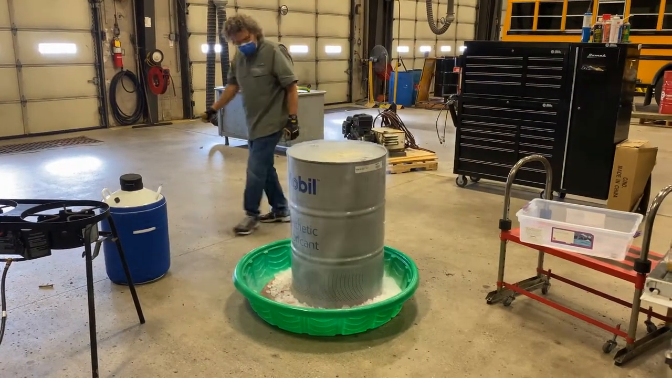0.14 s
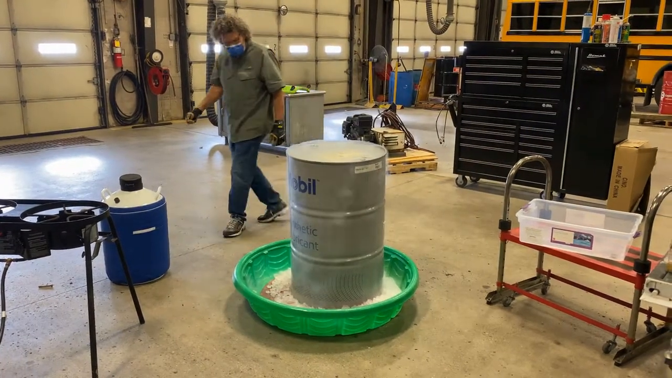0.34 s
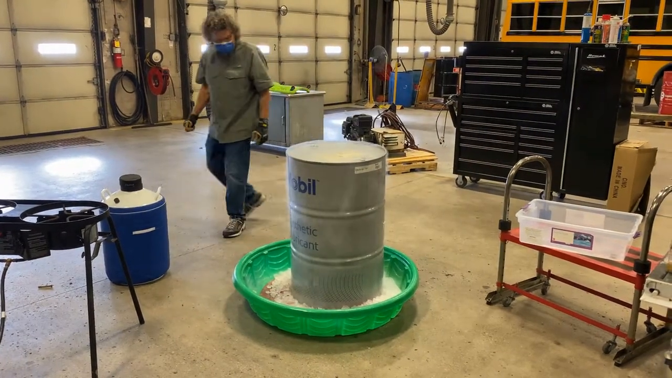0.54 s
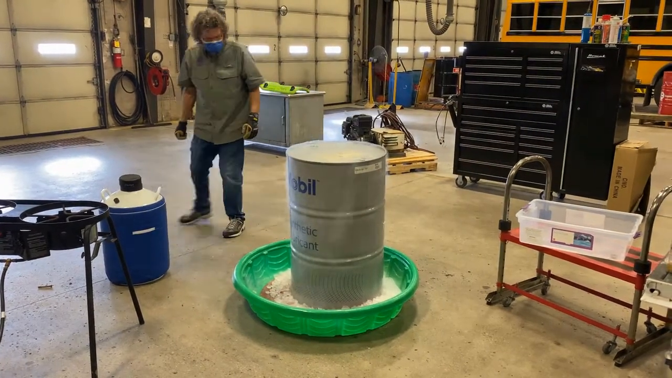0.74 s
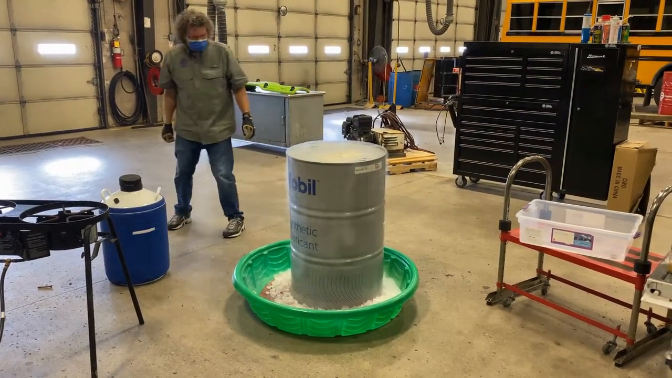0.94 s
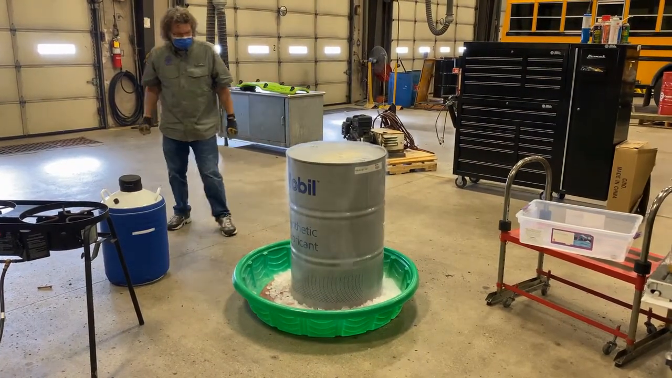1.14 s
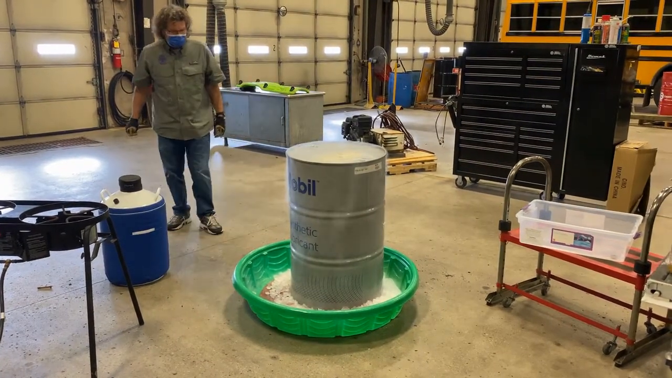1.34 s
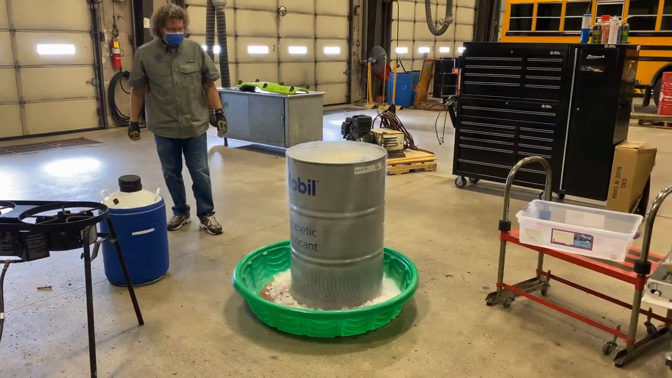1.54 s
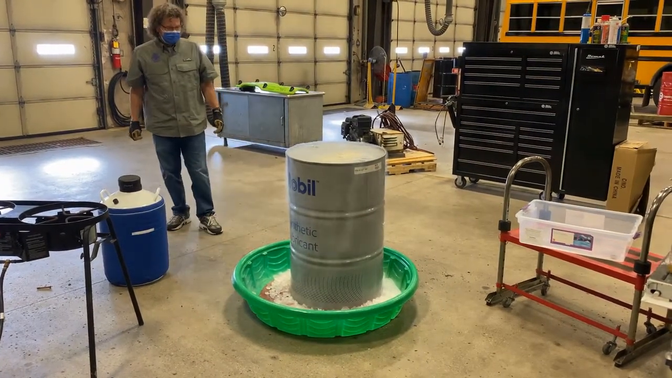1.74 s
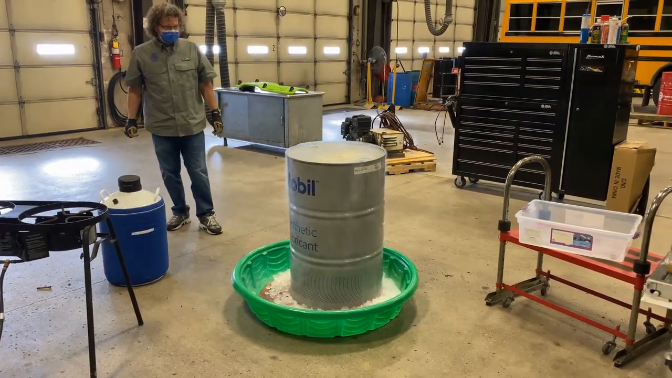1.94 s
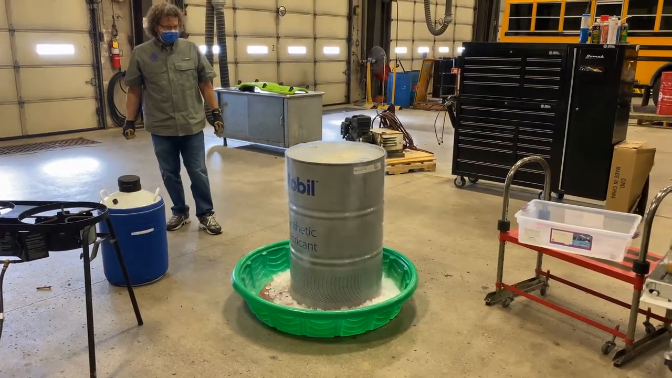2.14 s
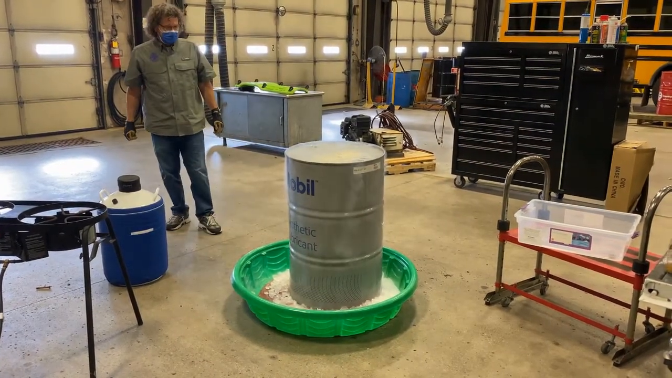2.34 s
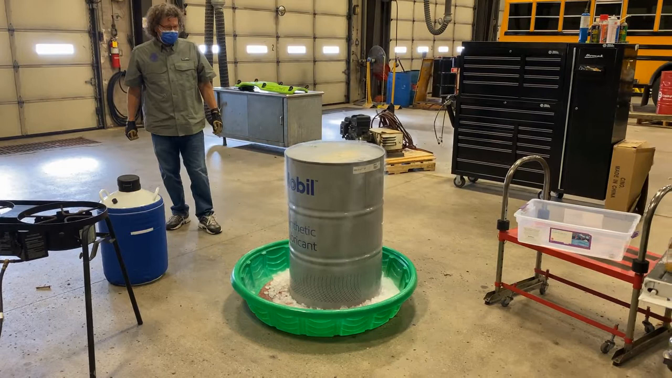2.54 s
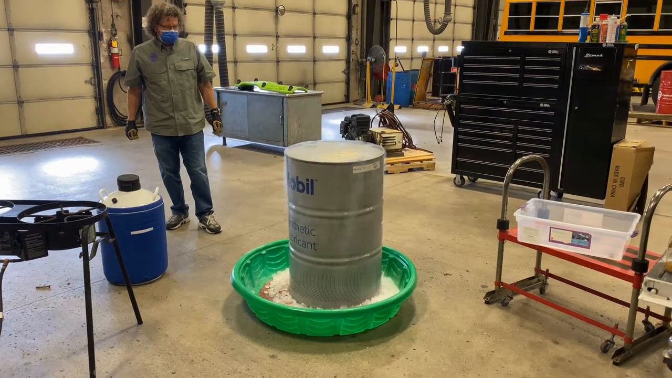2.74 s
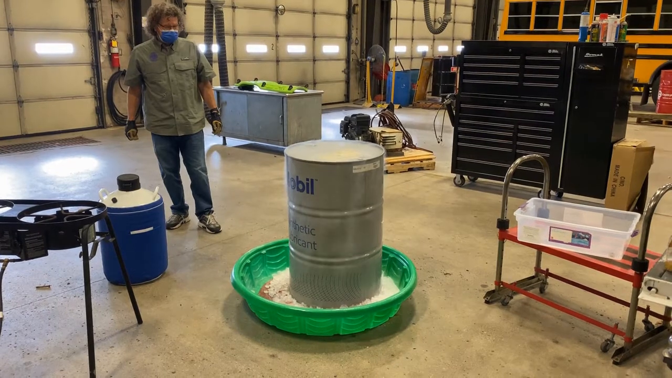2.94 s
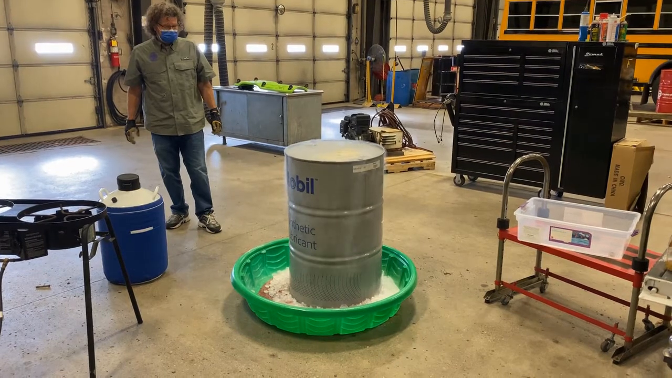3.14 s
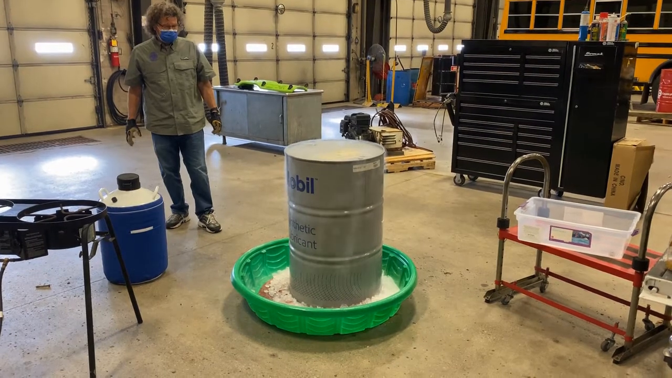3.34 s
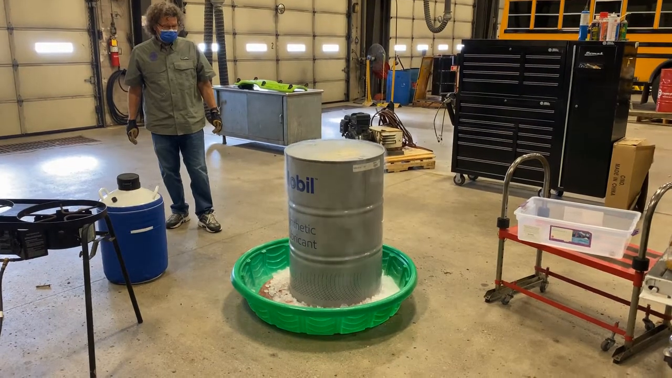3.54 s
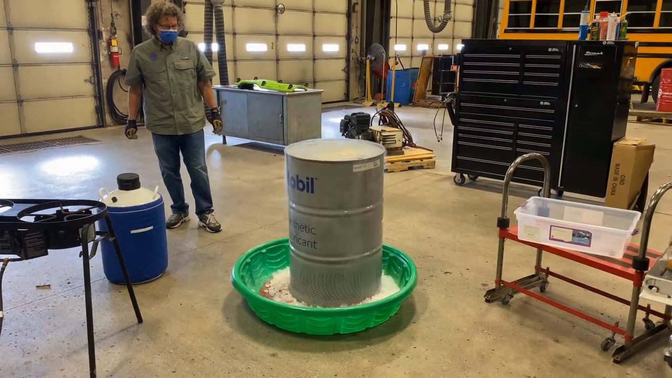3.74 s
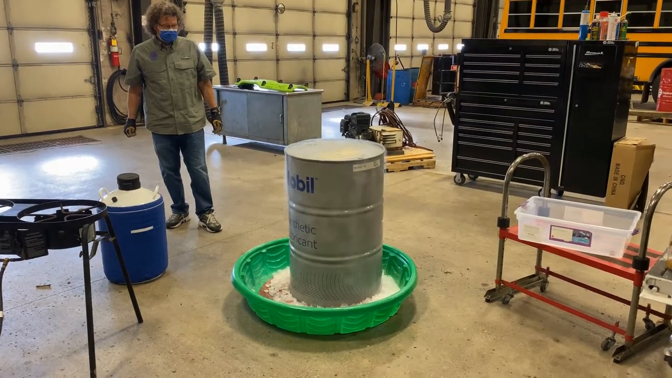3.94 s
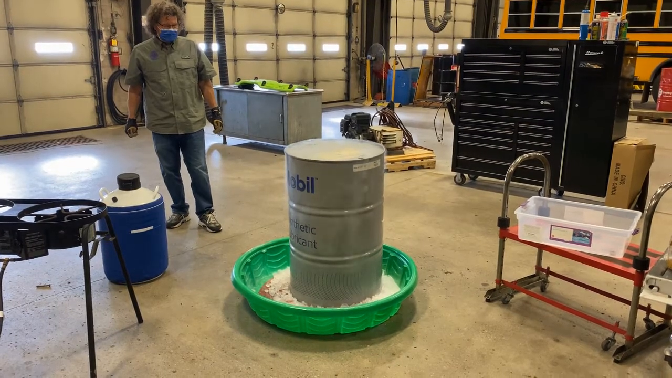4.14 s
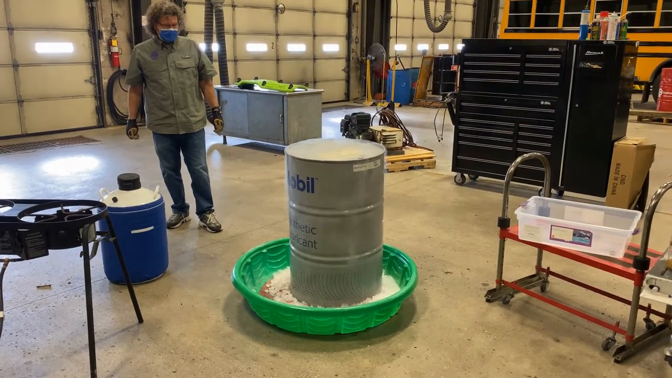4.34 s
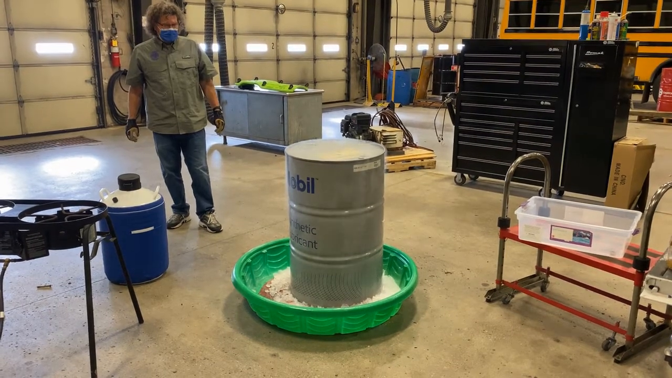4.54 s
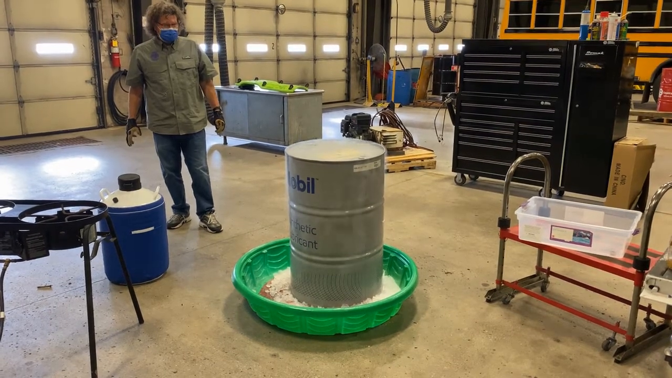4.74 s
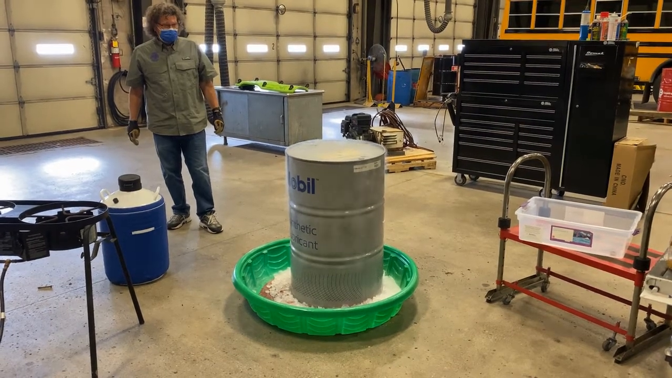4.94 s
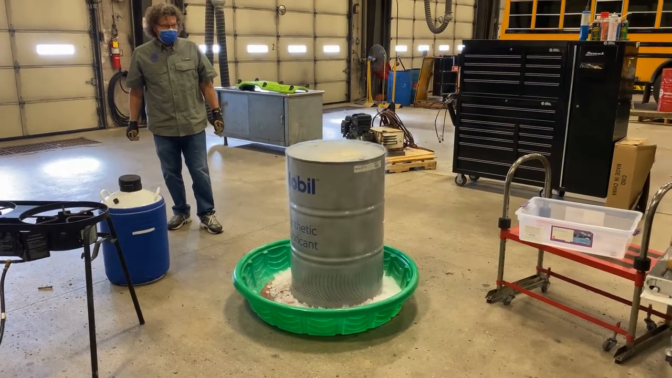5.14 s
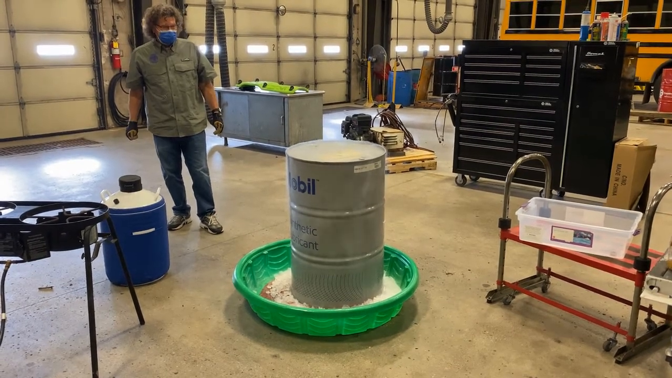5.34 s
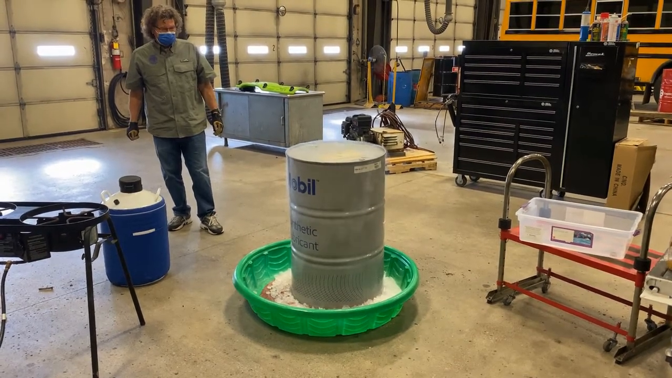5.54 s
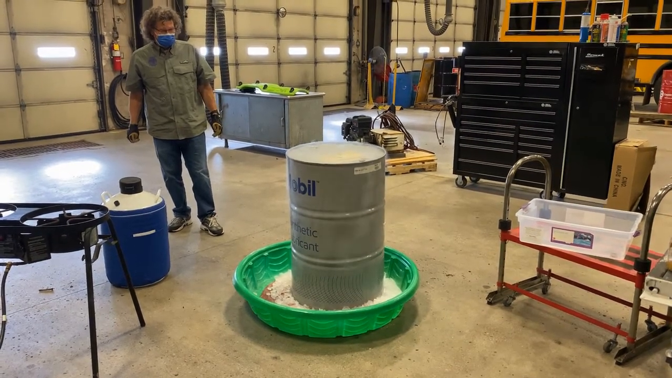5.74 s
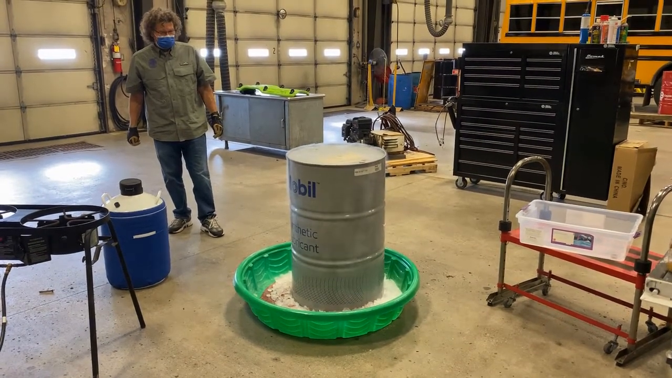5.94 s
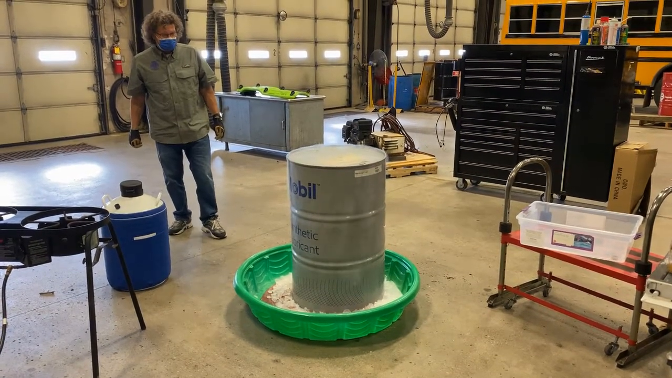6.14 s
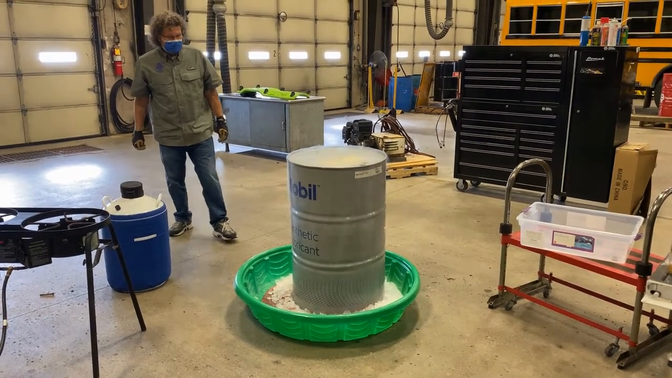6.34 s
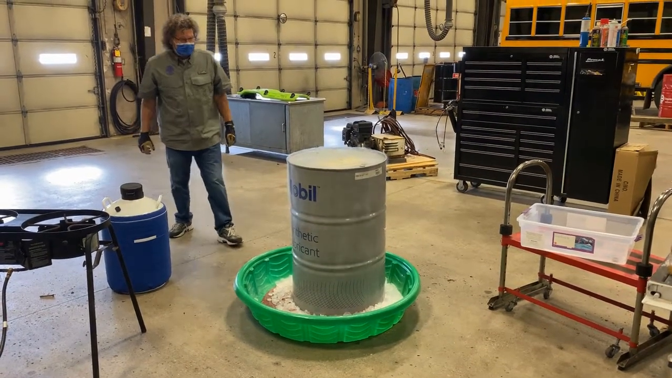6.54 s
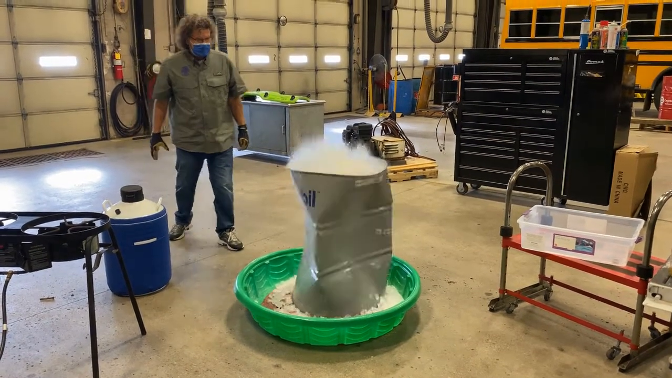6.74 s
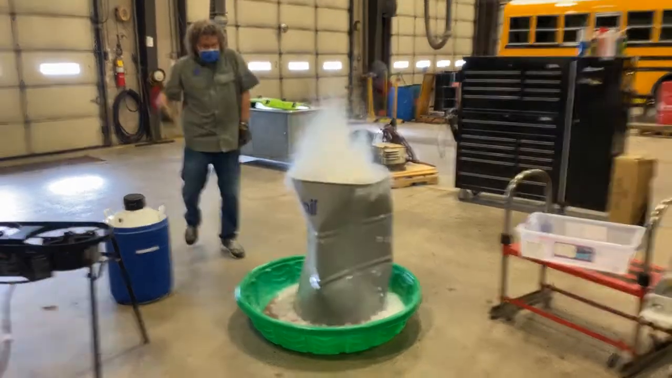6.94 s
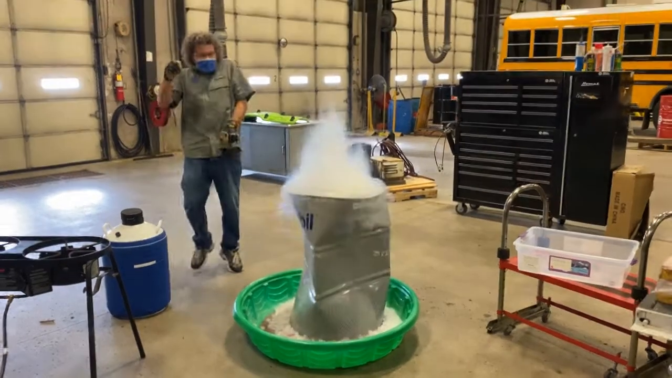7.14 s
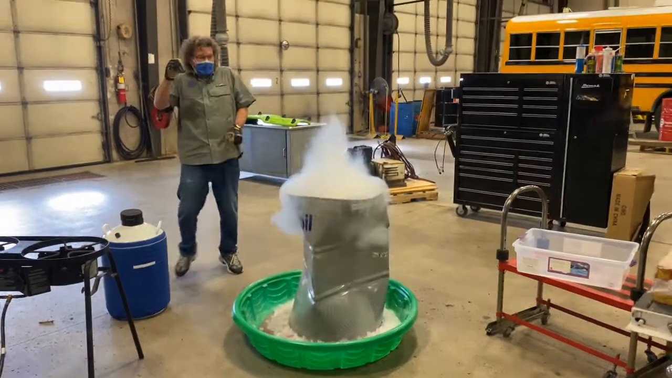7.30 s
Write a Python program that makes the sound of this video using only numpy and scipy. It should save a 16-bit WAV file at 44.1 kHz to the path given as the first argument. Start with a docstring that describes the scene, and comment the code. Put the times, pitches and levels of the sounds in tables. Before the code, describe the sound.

A low steady workshop hum with faint ice fizz and sparse metallic ticks, then a sealed steel drum suddenly implodes with a huge crunching bang.

```python
"""A sealed steel drum, chilled with ice, implodes in a large workshop where a distant compressor hums.
First ice fizzes as filtered noise and crackle, and the loaded shell ticks as small cracks ringing its modes.
Then the wall creaks, buckles in a burst of snaps and slams inward as heaving modes and a puff of pressure.
The hall booms in shaped, decaying noise; the recorder's gain control ducks and lets the tail swell back."""
import sys
import numpy as np
from scipy import signal
from scipy.fft import rfft, irfft, next_fast_len
from scipy.io import wavfile
from scipy.ndimage import uniform_filter1d, minimum_filter1d

SR = 44100
rng = np.random.default_rng(int(sys.argv[2]) if len(sys.argv) > 2 else 0)


def waveform_to_disk(signal):
    """Save audio, clipped to [-1, 1], as 16-bit WAV at the path in sys.argv[1]."""
    frames = np.transpose(np.atleast_2d(signal))
    scaled = np.clip(frames, -1, 1) * 32767
    samples = np.round(scaled).astype(np.int16)
    wavfile.write(sys.argv[1], SR, samples)


N = 325017
TIME = np.arange(N) / SR

# Spectra are (f/Hz, relative level/dB per Hz); modes are (f/Hz, relative level/dB, t60/s).
# compressor: multiples of the stroke rate with their own levels, some strong, some weak
# (multiple, rms level before waver and pan/dB)
STROKES_HZ = 10.195
HUM_MULTIPLES = [(6, -52), (8, -68), (9, -57), (10, -58), (11, -48.5), (12, -53.5), (14, -49), (15, -46.5),
                 (16, -45), (17, -58), (20, -49), (22, -54), (36, -64), (46, -70)]
# skirt for its other multiples (f/Hz, rms level before waver and pan/dB)
HUM_SKIRT_LEVELS = [(40, -58), (60, -50), (190, -59), (210, -65), (240, -55), (270, -74.5), (350, -73),
                    (450, -78.5), (600, -104), (1000, -88)]
# thin motor tones (f/Hz, rms level before pan/dB)
WHINE_TONES = [(936, -70), (1240, -72.5), (1130, -72.5), (2620, -69.5)]
# ventilation spectrum (f/Hz, relative level/dB per Hz)
RUMBLE_SPECTRUM = [(20, -32), (35, -12), (58, -3.5), (90, -4.5), (160, -8.5), (250, -12.5), (400, -21),
                   (750, -30), (2000, -34.5), (16000, -86)]
# ice fizz spectrum (f/Hz, relative level/dB per Hz)
FIZZ_SPECTRUM = [(200, -0.5), (700, -5), (1200, 0.5), (1900, -2), (2300, 1.5), (2650, 2), (3200, 0.5),
                 (4000, -3), (5500, -6.5), (7000, -6.5), (9500, -6.5), (12000, -11), (14000, -9),
                 (16000, -13.5)]
# left-right likeness of diffuse sound (f/Hz, correlation from -1 to 1)
PORT_LIKENESS = [(60, 1), (140, 0.84), (300, 0.41), (700, -0.14), (2500, 0.32), (5000, -0.25), (7000, 0.2)]
# ticks of the cold shell, with two bright echoes of the strongest at 0.6295 and 0.6528 s
# (t/s, relative level/dB, centre f/Hz, relative treble level/dB, ring spread/octaves)
SHELL_TICKS = [(0.077, -32.5, 1590, -13.5, 1), (0.2368, -37.5, 1690, -20, 1), (0.385, -37.5, 2800, -26, .7),
               (0.516, -33.5, 2270, -35, 0.72), (0.6175, -11, 1800, -22, 0.46), (0.6185, -33, 540, -30, .3),
               (0.6295, -25, 3700, -11, 0.45), (0.6528, -28.5, 2100, -12, 1), (0.7574, -33, 1500, -32, 0.3),
               (1.0555, -44.5, 2400, -9, 0.89), (1.0839, -39, 2360, -10, 0.9),
               (1.5065, -31.5, 2500, -17, .9), (1.7589, -41, 2570, -24, 1), (2.149, -23, 2130, -25, .8),
               (2.1495, -31, 5500, -26, 0.25), (2.2457, -41, 1780, -8, 0.86), (2.3431, -39, 5400, -18, .3),
               (2.7982, -34, 1400, -15.5, 0.67), (2.9482, -40.5, 1730, -11, 0.7),
               (3.03, -42.5, 1270, -30, .2), (3.0963, -23.5, 2270, -23, .35), (3.0975, -34, 540, -27, .3),
               (3.099, -25, 1620, -28, .35), (3.2255, -33, 2590, -12.5, 1.1),
               (3.3203, -32.5, 2300, -21, 0.73), (3.4909, -32.5, 1820, -12.5, 0.33),
               (3.7309, -41.5, 2620, -29.5, 0.77), (4.0815, -25, 2450, -18.5, 0.52),
               (4.313, -33, 2100, -23, 0.38), (4.784, -41, 2900, -15, .5), (4.8352, -40.5, 3000, -16, 0.57),
               (5.0688, -34.5, 1850, -16, 0.5), (5.2105, -45, 6800, 0.5, .4), (5.475, -42, 4500, -5, .8),
               (5.5787, -44, 3000, -6.5, 1), (5.6511, -40, 1870, -20, 0.28), (6.0028, -48, 4300, -3, 1.1),
               (6.0422, -47, 4300, -5, 1), (6.0875, -34.5, 2740, -17, 0.45), (6.1404, -37, 2800, -10.5, 1),
               (6.2302, -36.5, 1580, -16.5, 0.37), (6.2941, -49.5, 5400, -0.5, 1.1),
               (6.5555, -29, 2000, -14.5, 0.79), (6.691, -32, 1900, -17, .6), (6.708, -32, 1900, -22, .6)]
# modes of the taut shell (f/Hz, relative level/dB, t60/s)
TAUT_SHELL_MODES = [(540, 3, 0.024), (1100, -7, 0.016), (1340, 0, 0.017), (1574, 3, 0.0099),
                    (1820, -2, 0.022), (2100, -1, 0.015), (2600, 0, 0.028), (2905, 1.5, 0.013),
                    (3350, -3, .012), (3750, -6, 0.013), (4420, -10, 0.0074), (5240, -10.5, 0.016),
                    (6100, -11, .012), (7300, -7, .014)]
# echoes off the floor and nearby surfaces (delay t/s, level/dB)
SURFACE_ECHOES = [(.0045, -13.5), (.011, -12)]
# hall decay (f/Hz, t60/s)
HALL_DECAY = [(60, 4.5), (120, 0), (250, 0.6), (1000, 1.16), (3000, 1.22), (6000, 1.0), (10000, 0.7),
              (16000, 0.3)]
# settling ice spectrum (f/Hz, relative level/dB per Hz)
SETTLING_SPECTRUM = [(100, -11), (400, -4), (800, -2), (1800, 3.5), (4000, -5.5), (6500, -9), (9000, -20),
                     (16000, -28)]
# creak spectrum (f/Hz, relative level/dB per Hz)
CREAK_SPECTRUM = [(300, -4), (750, -13), (1500, 0), (2800, -1), (3800, -8), (7000, -11), (9500, -10),
                  (16000, -17)]
# folding steel spectrum (f/Hz, relative level/dB per Hz)
STEEL_SPECTRUM = [(40, -27), (150, 14), (320, 4), (540, 3), (850, 1), (1300, 0), (1750, 2.5), (2150, -0.5),
                  (2680, -0.5), (3600, -4), (4400, -8.5), (5400, -12), (6600, -18), (8000, -26),
                  (11000, -40), (16000, -52)]
# largest folds snapping through (t/s, relative peak level/dB, centre f/Hz)
LARGE_FOLDS = [(6.7215, -15, 2200), (6.7245, -13, 2800), (6.7285, -15, 544), (6.7288, -11, 2600),
               (6.7305, -13, 4400), (6.7315, -6, 1700), (6.733, -14.5, 544), (6.7345, -7.5, 2900),
               (6.7345, -12, 7100), (6.7366, -11.5, 320), (6.7378, -10, 4300), (6.7398, -1, 1400),
               (6.7415, -4, 2680), (6.742, -12, 595), (6.7555, 4.5, 2900), (6.756, -5, 5000),
               (6.7585, 5, 1500), (6.7615, 3, 2600), (6.7665, 2.5, 2300), (6.7695, 4, 1290),
               (6.7735, 0, 2650), (6.779, -1, 1800), (6.792, -2.5, 3070), (6.797, -1, 2000),
               (6.802, -2, 1400), (6.811, -4, 1800)]
# modes of the buckling wall (f/Hz, relative level/dB, t60/s)
BUCKLING_WALL_MODES = [(315, -4, 0.036), (542, -4, 0.074), (680, -11, .04), (1250, -1.5, 0.054),
                       (1390, -3, .05), (1520, 0, 0.055), (1750, 1.5, 0.042), (2123, -3, .04),
                       (2345, -4, 0.057), (2644, -0.5, 0.045), (2890, -3, 0.043), (3180, -5, .04),
                       (3810, -6, .03), (4230, -4, .025), (4380, -6, .025), (4970, -7, 0.03),
                       (5990, -10, 0.025), (7070, -4, .022), (7540, -7, .022)]
# modes of the buckled shell (f/Hz, relative level/dB, t60/s)
BUCKLED_SHELL_MODES = [(232, 3, 0.72), (275, 3, .8), (312, 9, 0.5), (401, -2, 0.8), (468, 1, 0.83),
                       (546, 0, 0.5), (1082, 3, 0.8), (1220, 5, 0.7), (1272, 1, 0.7), (1525, 2, 0.5),
                       (1826, 2, 0.7), (2018, 3, 0.87), (2349, 0, 0.5), (2660, -2, 0.45), (2914, 0, 0.5),
                       (3170, 0, .5), (3898, -2, .45), (4660, -2, .45)]
# shattering ice spectrum (f/Hz, relative level/dB per Hz)
ICE_SPECTRUM = [(500, -20), (3000, -9), (7000, 3.5), (9000, 2), (12000, 0), (16000, -1.5)]
# heaving drum heads (f/Hz, relative level/dB, t60/s)
DRUM_HEAD_MODES = [(81.5, 17, 0.065), (98, 6, 0.62), (159, 14, 0.047), (175.6, -10, 0.5)]
# boom of the hall's crowded low modes (f/Hz, relative level/dB per Hz)
BOOM_SPECTRUM = [(20, -51), (42, -29), (58, -5), (80, -0.5), (100, -5), (125, -12.5), (170, -16),
                 (220, -27), (320, -21), (450, -34), (1500, -70.5)]
# phase by which left leads in the recorder's top range (f/Hz, phase/rad)
TREBLE_LEAD = [(8000, 2.8), (9300, 1.7), (10700, 0), (11500, -0.2), (12600, -2.5), (13300, -3.1),
               (14500, -4.4), (15500, -6.2)]

CREAK_S, BUCKLE_S, SLAM_S = 6.682, 6.7205, 6.7455   # the wall creaks, gives way, slams in
PORT_LAG_S = .000023   # right port after left
ONE_PORT_ABOVE_HZ, CUTOFF_HZ = 8000, 15900   # recorder


def from_db(db):
    """Decibels to gain."""
    return 10 ** (np.asarray(db) / 20)


def rms_one(x):
    """Scale to rms 1."""
    return x / np.sqrt(np.mean(x ** 2) + 1e-20)


def peak_one(x):
    """Scale to peak 1."""
    return x / np.abs(x).max()


def at_hz(points, hz):
    """Read a table on a log-frequency axis."""
    known_hz, values = np.transpose(points)
    return np.interp(np.log(np.maximum(hz, 1)), np.log(known_hz), values)


def panned(x, pan_db):
    """Set left pan_db above right; a negative value leans right."""
    return x * from_db(np.array([[.5], [-.5]]) * pan_db)


def coloured(x, spectrum):
    """Filter a steady sound through a spectrum; rms 1."""
    size = next_fast_len(N)
    hz = np.arange(size // 2 + 1) * SR / size
    filtered = irfft(rfft(x, size) * from_db(at_hz(spectrum, hz)), size)
    return rms_one(filtered[..., :N])


def diffuse(size):
    """White noise from all around: alike at both ports in the bass, loosely related higher up."""
    padded = next_fast_len(size)
    mid, side = rfft(rng.standard_normal((2, padded)))
    hz = np.arange(len(mid)) * SR / padded
    alike = np.clip(at_hz(PORT_LIKENESS, hz), -1, 1)
    both = np.sqrt(1 + alike) * mid + np.sqrt(1 - alike) * side * [[1], [-1]]
    return rms_one(irfft(both, padded)[:, :size])


def direct(x):
    """Sound straight from the drum reaches the right port a little after the left."""
    return np.array([x, np.roll(x, round(PORT_LAG_S * SR))])


def snaps(per_s, spread_db):
    """Random clicks of uneven size; rms 1."""
    sizes = from_db(spread_db * np.minimum(rng.exponential(1, N), 4))
    signed = sizes * rng.choice([-1, 1], N)
    return rms_one(signed * (rng.random(N) < per_s / SR))


def dying(t, t60):
    """Free decay, 60 dB in t60."""
    return np.exp(-np.log(1000) * t / t60)


def envelope(start_s, attack_s, hold_s, t60):
    """Straight rise to 1, hold, free decay."""
    t = TIME - start_s
    rise = np.clip(t / max(attack_s, 1e-4), 0, 1)
    return rise * dying(np.maximum(t - attack_s - hold_s, 0), t60)


def ring(t, hz, t60):
    """A struck mode: a sine in free decay from height 1."""
    return np.sin(2 * np.pi * hz * t) * dying(t, t60)


def struck(t, modes, centre_hz, spread_octaves, vary_db):
    """A local blow rings the modes near its own pitch, a little differently toward each port; peak 1."""
    hz, mode_db, t60 = np.transpose(modes)[:, :, None]
    near = np.exp(-.5 * (np.log2(hz / centre_hz) / spread_octaves) ** 2)
    weight = near * from_db(mode_db + vary_db * rng.standard_normal((2, len(hz), 1)))
    body = (weight * rng.choice([-1, 1], hz.shape) * ring(t, hz, t60)).sum(axis=1)
    return body / (np.abs(body).max() + 1e-20)


def through(x, response):
    """Pass a sound through a stereo impulse response."""
    return signal.fftconvolve(np.atleast_2d(x), response, axes=-1)[:, :N]


def compressor(pan_db=-4.0, waver_db=1.5, port_phase=0.48, scatter=0.54):
    """Every stroke repeats the same push; the hall smears it evenly over the cycle, into a drone."""
    levels, out = dict(HUM_MULTIPLES), np.zeros((2, N))
    stroke = 2 * np.pi * STROKES_HZ * TIME + rng.uniform(0, 2 * np.pi)
    golden_angle = np.pi * (3 - np.sqrt(5))
    knots = np.linspace(0, TIME[-1], 20)
    for k in range(4, 56):
        level_db = levels.get(k, at_hz(HUM_SKIRT_LEVELS, k * STROKES_HZ))
        # quadratic phase spreads the multiples over the cycle
        smear = golden_angle * k * k / 2 + scatter * rng.standard_normal()
        phase = smear + port_phase * rng.standard_normal((2, 1)) * k / 20
        waver = np.interp(TIME, knots, from_db(level_db + waver_db * rng.standard_normal(20)))
        out += np.sqrt(2) * waver * np.sin((k * stroke + phase).astype(np.float32))
    return panned(out, pan_db)


def whines(pan_db=-9.0, fading=0.55, count=40):
    """Thin motor tones reach each port by many paths, so they fade in and out."""
    knots, out = np.linspace(0, TIME[-1], count), np.zeros((2, N))
    for hz, tone_db in WHINE_TONES:
        steady = np.exp(2j * np.pi * rng.random((2, 1)))
        wandering = rng.standard_normal((2, count)) + 1j * rng.standard_normal((2, count))
        paths = steady + fading * wandering
        carrier = np.exp(2j * np.pi * hz * TIME)
        tone = np.array([(np.interp(TIME, knots, port) * carrier).real for port in paths])
        out += from_db(tone_db) * rms_one(tone)
    return panned(out, pan_db)


def ventilation(level_db=-45):
    """Ventilation rumbles as low, diffuse noise."""
    return panned(from_db(level_db) * coloured(diffuse(N), RUMBLE_SPECTRUM), pan_db=-2.0)


def fizz(start_db=-49, fade_db_per_s=0.7457, crackle_db=-11, drop_after_slam_db=-7):
    """Ice fizzes with fine crackle, fading as the drum cools; the fizz is quieter after the slam."""
    level_db = start_db - fade_db_per_s * TIME + drop_after_slam_db * (TIME > SLAM_S)
    crackle = from_db(crackle_db) * snaps(per_s=500, spread_db=3.0)
    return from_db(level_db) * coloured(diffuse(N) + crackle, FIZZ_SPECTRUM)


def ticks(level_db=-0.5, treble_db=11.5, crack_t60=0.029, vary_db=3.5, attack_s=0.00056):
    """Each tick is a tiny crack with a ring of the shell, strongest near the tick's own pitch."""
    t, out = TIME[:SR // 10], np.zeros((2, N))
    bright = signal.butter(1, [4500, 11500], "band", fs=SR, output="sos")
    onset = 1 - np.exp(-t / attack_s)
    for s, peak_db, centre_hz, share_db, spread_octaves in SHELL_TICKS:
        body = onset * struck(t, TAUT_SHELL_MODES, centre_hz, spread_octaves, vary_db)
        burst = direct(rng.standard_normal(len(t))) * dying(t, crack_t60)
        crack = onset * signal.sosfilt(bright, burst)
        tick = panned(peak_one(body), pan_db=-5.5) + from_db(share_db + treble_db) * peak_one(crack)
        start = round(s * SR)
        out[:, start:start + len(t)] += from_db(peak_db + level_db) * tick
    echoes = sum(from_db(echo_db) * np.roll(out, round(delay * SR)) for delay, echo_db in SURFACE_ECHOES)
    return out + echoes


def hall(x, size=512):
    """The hall stores energy in each band and gives it back as diffuse noise with that band's decay."""
    hz, _, frames = signal.stft(x, SR, nperseg=size)
    fed = uniform_filter1d(np.mean(np.abs(frames) ** 2, axis=0), size=3, axis=0)
    kept = dying(size / 2 / SR, at_hz(HALL_DECAY, hz)) ** 2   # energy left after one frame
    stored = np.zeros_like(fed)
    for i in range(2, fed.shape[1]):   # the first reflections take two frames to return
        stored[:, i] = kept * stored[:, i - 1] + (1 - kept) * fed[:, i - 2]
    air = signal.stft(diffuse(N), SR, nperseg=size)[2]
    air = air / np.sqrt(np.mean(np.abs(air) ** 2))
    return signal.istft(air * np.sqrt(np.abs(stored)), SR, nperseg=size)[1][:, :N]


def settling_ice(start_s=.626, level_db=-39, t60=0.85, slide_db=-52):
    """The strongest tick shakes the ice on the lid, which crackles as it settles and then slides a little."""
    crackle = coloured(diffuse(N) + snaps(per_s=390, spread_db=0.5), SETTLING_SPECTRUM)
    shaken = from_db(level_db) * (TIME > start_s) * dying(np.abs(TIME - start_s), t60)
    sliding = from_db(slide_db) * envelope(start_s=1.03, attack_s=0.046, hold_s=0.21, t60=0.69)
    return crackle * (shaken + sliding)


def creak(level_db=-42.5, attack_s=0.014, hold_s=0.024, t60=0.08, scatter_db=-4):
    """The wall starts to give with a faint, gritty creak."""
    grit = direct(snaps(per_s=1500, spread_db=2.0)) + from_db(scatter_db) * diffuse(N)
    return from_db(level_db) * envelope(CREAK_S, attack_s, hold_s, t60) * coloured(grit, CREAK_SPECTRUM)


def crush():
    """Swell and decay of the grinding as the walls meet."""
    return envelope(SLAM_S, attack_s=0.00078, hold_s=0.011, t60=0.15)


def big_folds(level_db=-2.0, spread_octaves=0.42, vary_db=4.0, attack_s=0.00107, detune=0.013,
              sag_per_s=0.32, path_s=0.00014):
    """Each large fold snaps through and rings the wall; the pitch sags as the panel loses its tension."""
    t, out = TIME[:SR // 8], np.zeros((2, N))
    for s, peak_db, centre_hz in LARGE_FOLDS:
        arrived = np.maximum(t - path_s * rng.random((2, 1, 1)), 0)
        bent = arrived * (1 + detune * rng.standard_normal() - sag_per_s * arrived / 2)
        onset = 1 - np.exp(-t / attack_s)
        fold = onset * struck(bent, BUCKLING_WALL_MODES, centre_hz, spread_octaves, vary_db)
        start = round(s * SR)
        out[:, start:start + len(t)] += from_db(peak_db + level_db) * peak_one(fold)
    return out


def folding_steel(folding_db=-5.5, crush_db=-5, scatter_db=-2.0, ring_db=-5.0):
    """Folds race through the wall as a swelling burst of snaps, the walls grind and the shell rings on."""
    folding = from_db(folding_db) * envelope(BUCKLE_S, attack_s=0.058, hold_s=0, t60=0.35)
    level = folding + from_db(crush_db) * crush()
    # the wide wall radiates along many paths
    creases = snaps(per_s=2000, spread_db=1.5) + from_db(scatter_db) * diffuse(N)
    steel = level * coloured(creases, STEEL_SPECTRUM) + big_folds()
    shell = sum(from_db(mode_db) * rng.choice([-1, 1], (2, 1)) * ring(TIME[:SR], hz, t60)
                for hz, mode_db, t60 in BUCKLED_SHELL_MODES)
    rings = through(steel, shell / np.sqrt(5 * np.sum(shell ** 2)))
    pan_db = np.where(TIME < SLAM_S, -7.5, -1.0)   # well to the right, then nearly centred
    return panned(steel, pan_db) + from_db(ring_db) * rings


def shattering_ice(shatter_db=-25.5, crush_db=-22, scatter_db=-9):
    """Ice shatters as soon as the wall gives way and sprays as the walls grind: dense, bright snaps."""
    shatter = from_db(shatter_db) * envelope(BUCKLE_S, attack_s=0.002, hold_s=0.017, t60=0.069)
    shards = direct(snaps(per_s=5400, spread_db=0.0)) + from_db(scatter_db) * diffuse(N)
    return (shatter + from_db(crush_db) * crush()) * coloured(shards, ICE_SPECTRUM)


def slam(puff_db=3.0, boom_db=3.5, boom_build_s=0.019, boom_t60=1.25):
    """The air is sucked inward, the heads heave, a slow puff of pressure returns, and the hall booms."""
    t = np.maximum(TIME - SLAM_S, 0)
    heave = -sum(from_db(mode_db) * ring(t, hz, t60) for hz, mode_db, t60 in DRUM_HEAD_MODES)
    heave = signal.sosfilt(signal.butter(1, 32, "high", fs=SR, output="sos"), heave)
    rise = t / .022   # the puff peaks after 22 ms
    puff = from_db(puff_db) * rise ** 2 * np.exp(2 * (1 - rise))
    modes = coloured(diffuse(N), BOOM_SPECTRUM)
    # the modes beat, but share a steady store of energy
    modes /= np.sqrt(uniform_filter1d(np.mean(modes ** 2, axis=0), size=4000))
    boom = from_db(boom_db) * modes * (1 - np.exp(-t / boom_build_s)) * dying(t, boom_t60)
    return panned(heave + boom, pan_db=-2.5) + puff


def scene(tick_hall_db=-10, crumple_hall_db=-4.0):
    """Hum and fizz throughout, ticks, then the implosion; ticks and crash also feed the hall."""
    small = ticks()
    crash = creak() + folding_steel() + shattering_ice()
    tail = hall(from_db(tick_hall_db) * small + from_db(crumple_hall_db) * crash)
    workshop = compressor() + whines() + ventilation()
    return workshop + fizz() + settling_ice() + small + crash + slam() + tail


def widened_treble(x):
    """The recorder takes the top of the range from the left port and turns its phase for the right."""
    size = next_fast_len(N + SR // 10)
    left, right = rfft(np.pad(x, ((0, 0), (0, size - N)), "reflect"))
    hz = np.arange(len(left)) * SR / size
    turned = left * np.exp(-1j * at_hz(TREBLE_LEAD, hz))
    return irfft(np.array([left, np.where(hz > ONE_PORT_ABOVE_HZ, turned, right)]), size)[:, :N]


def gain_control(x, limit_db=-3.0, hold_s=0.16, release_db_per_s=70, lingering=0.32):
    """The gain drops at once on a loud sound, is held briefly, then climbs most of the way back."""
    power = uniform_filter1d(np.mean(x ** 2, axis=0), size=180)
    level_db = 10 * np.log10(np.maximum(power, 1e-12))
    over_db = np.maximum(level_db - limit_db, 0)
    half = max(round(hold_s * SR / 2), 1)
    # largest excess within the past hold time
    held_db = -minimum_filter1d(-over_db, 2 * half + 1, origin=half, mode="nearest")
    released_db = release_db_per_s * TIME
    cut_db = np.maximum.accumulate(held_db + released_db) - released_db
    cut_db = np.maximum(cut_db, lingering * np.maximum.accumulate(over_db))
    return x * from_db(-uniform_filter1d(cut_db, size=90))


def record(dry, ceiling=0.98):
    """Widened treble, gain control, rounded peaks, and a steep cut at the top."""
    levelled = gain_control(widened_treble(dry))
    rounded = levelled / (1 + (levelled / ceiling) ** 4) ** .25
    return signal.sosfilt(signal.ellip(10, .2, 80, CUTOFF_HZ, fs=SR, output="sos"), rounded)


dry = scene()
out = record(dry)
waveform_to_disk(out)
```